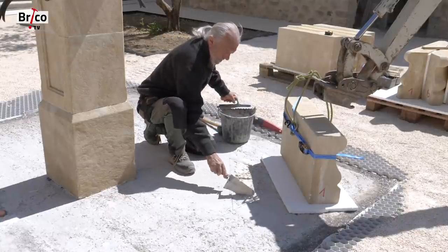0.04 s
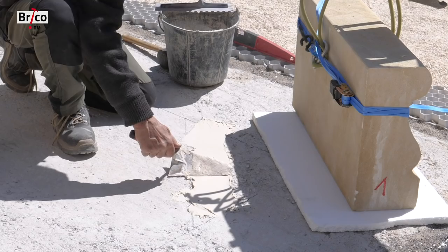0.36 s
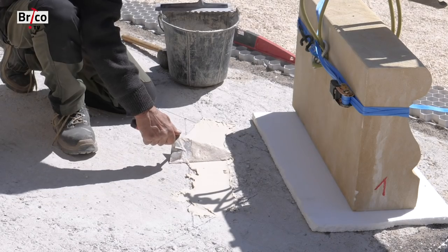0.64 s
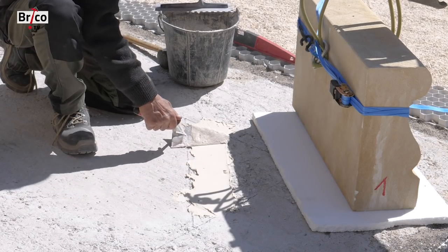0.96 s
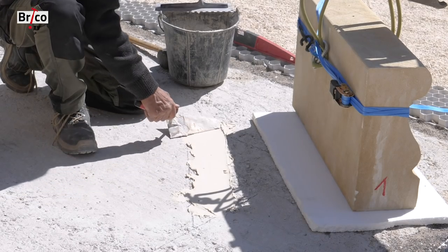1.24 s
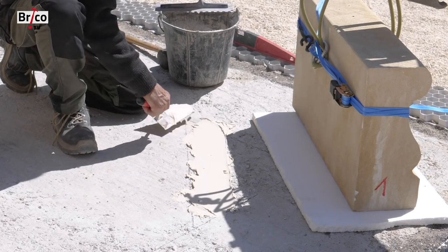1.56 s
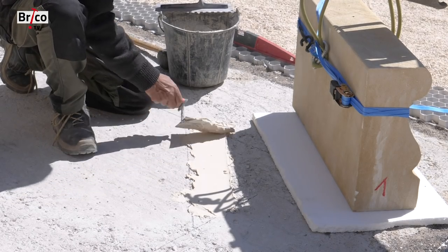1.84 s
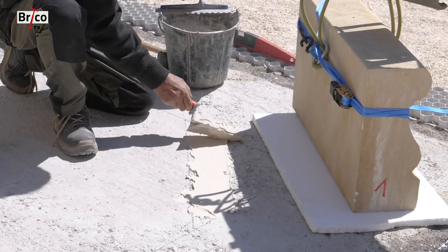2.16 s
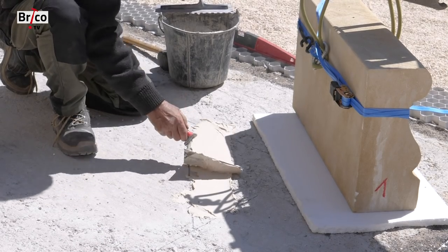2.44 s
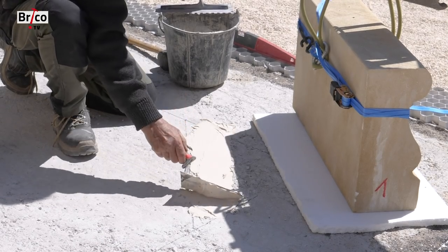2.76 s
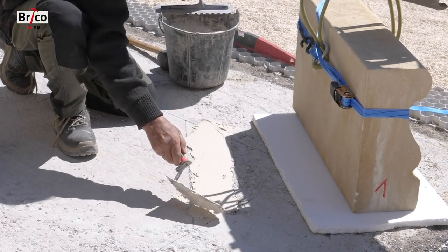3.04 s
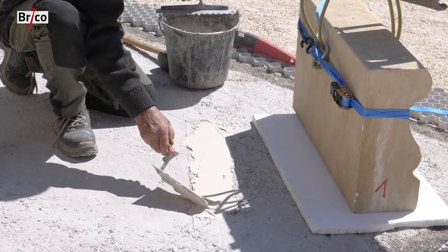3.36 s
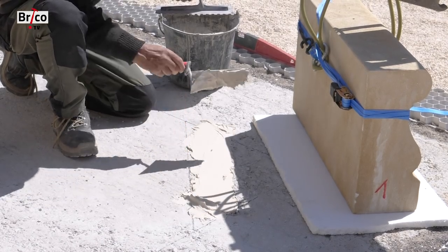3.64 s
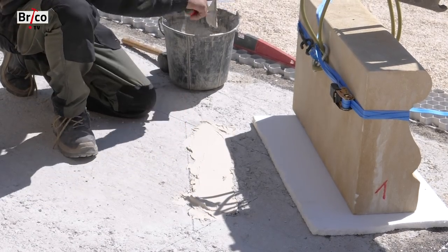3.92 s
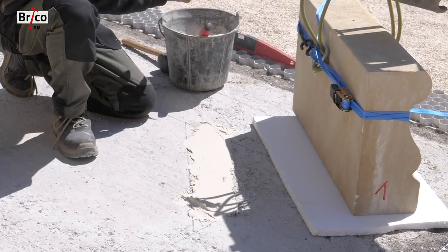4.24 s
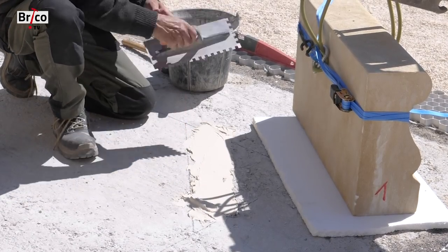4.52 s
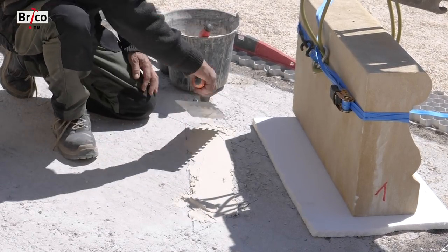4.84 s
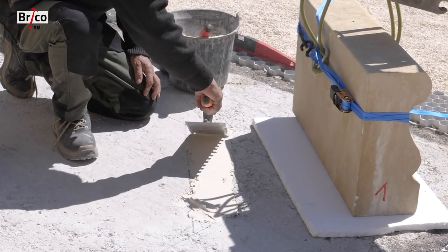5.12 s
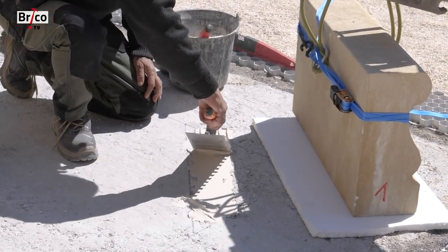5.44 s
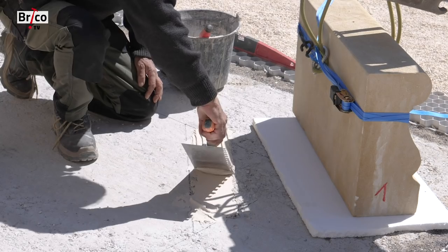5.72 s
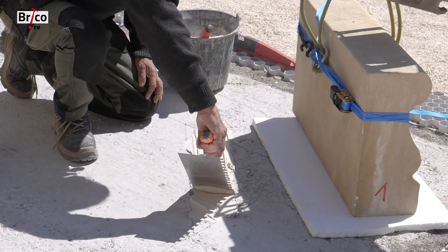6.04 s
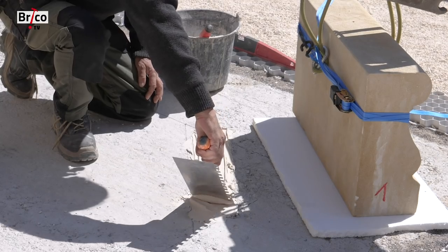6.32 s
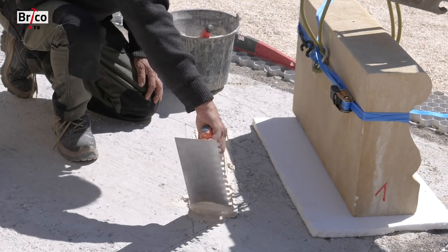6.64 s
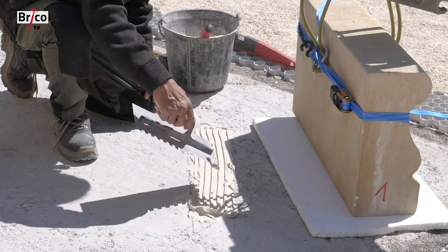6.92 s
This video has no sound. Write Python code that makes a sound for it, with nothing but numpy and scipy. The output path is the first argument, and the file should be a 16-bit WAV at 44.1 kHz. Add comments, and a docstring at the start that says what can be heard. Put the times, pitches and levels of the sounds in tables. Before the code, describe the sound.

Outdoors, gusts thump and rumble on the microphone while heavy clothing rustles. Two hard, damped trowel taps on concrete lead into short chops, a faint wet spreading hiss and a rasping scrape. The tool drops into a plastic bucket with a quick rattle, and a second steel blade gives a light ping. Its notched edge then grinds through mortar in a long, jerky scrape, ending with a short flick.

```python
"""An outdoor yard with a concrete slab. A mason taps, chops and smooths mortar with a pointed steel
trowel: knocks and crushed sand drive the damped blade, and wet paste hisses under its flat. The trowel
drops into a plastic bucket; a notched one rings as it is lifted, then combs the bed, its teeth sticking
and slipping on the concrete. Wind buffets the microphone and work clothes rustle throughout."""
import sys
import numpy as np
from scipy import signal
from scipy.fft import rfft, irfft
from scipy.io import wavfile
from scipy.ndimage import uniform_filter1d

SR = 44100
rng = np.random.default_rng(int(sys.argv[2]) if len(sys.argv) > 2 else 0)


def int16_out(signal):
    """Quantize to a 16-bit WAV file."""
    q = np.round(np.clip(np.atleast_2d(signal).T, -1, 1) * 32767)
    wavfile.write(sys.argv[1], SR, q.astype(np.int16))


N = 312228
TIME = np.arange(N) / SR
SHORT = 8192  # samples in one knock or skid

# tone of wet mortar: (frequency [Hz], level [dB])
PASTE_TONE = [(150, -0.5), (600, 1.5), (1300, 1), (2500, 0.5), (5000, -1.5), (9000, 0.5), (11500, -1),
              (14000, -5.5), (16000, -12)]
# tone of a trowel blade: (frequency [Hz], level [dB])
TROWEL_TONE = [(150, -3), (300, -18), (500, -0.5), (850, -9), (1600, -2), (2600, -3.5), (3700, -6),
               (6000, -10.5), (10000, -9), (13000, -17.5), (16000, -23)]
# resonances of the notched blade: (frequency [Hz], width [Hz], lift [dB])
NOTCHED_MODES = [(533, 90, 0.5), (1160, 46, 13), (1218, 50, 10), (1656, 170, 5), (2110, 62, 2.5),
                 (2980, 260, 5.5), (3250, 120, 3), (5030, 180, 7), (5600, 120, 3.5), (6070, 180, 5.5),
                 (6350, 120, 3.5), (9580, 260, 4), (10450, 300, 3)]


def undb(db):
    """Decibels to gain."""
    return 10 ** (np.asarray(db) / 20)


def unit(x):
    """Scale to rms 1."""
    return x / np.sqrt(np.mean(x ** 2) + 1e-18)


def curve(rows, column):
    """One dB column of a table, joined by straight lines in time; silent outside it."""
    rows = np.array(rows)
    return np.interp(TIME, rows[:, 0], rows[:, column], left=-120, right=-120)


def add(out, s, x):
    """Mix x into out from time s."""
    i = max(int(s * SR), 0)
    out[i:i + len(x)] += x[:max(len(out) - i, 0)]


def body(tone, modes=(), size=4096):
    """Causal impulse response, energy 1, of a broad tone lifted by resonances."""
    f = np.maximum(np.arange(size // 2 + 1) * SR / size, 1)
    hz, db = np.transpose(tone)
    db = np.interp(np.log(f), np.log(hz), db) - 20 * np.log10(1 + (hz[0] / f / 2) ** 2)
    for centre, width, lift in modes:
        db = db + lift / (1 + (2 * (f - centre) / width) ** 2)
    cepstrum = irfft(np.log(undb(db)))
    fold = 1 + np.sign(size // 2 - np.arange(size))  # minimum phase keeps the attack sharp
    fold[0] = 1
    return unit(irfft(np.exp(rfft(cepstrum * fold)))) / np.sqrt(size)


def ring(force, response):
    """Drive a body with a force."""
    return signal.fftconvolve(force, response)[:len(force)]


def split(x, hz):
    """The parts below and above a frequency."""
    return [signal.sosfilt(signal.butter(4, hz, kind, fs=SR, output="sos"), x)
            for kind in ("low", "high")]


def walk(rate):
    """Random drift, rms 1: levels held 1 / rate s and smoothed twice."""
    hold = int(SR / rate)
    held = rng.standard_normal(N)[np.arange(N) // hold]
    return unit(uniform_filter1d(uniform_filter1d(held, hold), hold))


def sand(rate, spread_db):
    """Clicks of grains, rate a second: many small, a few large."""
    when, weight, polarity = rng.random((int(rate * N / SR), 3)).T
    size = undb(spread_db * np.minimum(-np.log(1 - weight), 4))
    return unit(np.bincount((when * N).astype(int), size * np.sign(polarity - .5), N))


def strokes(rows, attack, release):
    """Envelope of hand movements: each sets in, swells or fades evenly, and dies away."""
    out, t = np.zeros(N), TIME[:SR]
    for s, length, start_db, end_db in rows:
        gain = undb(np.interp(t, [0, length], [start_db, end_db]))
        add(out, s, gain * np.minimum(t / attack, 1) * np.exp(-np.maximum(t - length, 0) / release))
    return out


def blows(rows, tone, modes, cross_hz, crunch, width, lift_db):
    """A click and a dying crunch; where it lands picks a main resonance, hardness the treble."""
    out, t = np.zeros(N), TIME[:SHORT]
    for s, db, decay, treble_db, hz in rows:
        low, high = split(body(tone, [*modes, (hz, width * hz, lift_db)]), cross_hz)
        force = crunch * rng.standard_normal(SHORT) * np.exp(-t / decay)
        force[0] += 1
        hit = unit(ring(force, low + undb(treble_db) * high))
        add(out, s, hit * undb(db) * np.sqrt((.005 + decay) * SR / SHORT))
    return out


def skid(length, rise, release):
    """Envelope of a slip: builds up, and dies away after its length."""
    t = TIME[:SHORT]
    return np.minimum(t / rise, 1) * np.exp(-np.maximum(t - length, 0) / release)


def skids(rows, grains, tone, modes, cross_hz, blade_trim_db, grit_trim_db, rise, release, edge_db):
    """Slips crush grains; the blade bends with the lows, the bit of edge that catches tints the highs."""
    out = np.zeros(N)
    spots_hz = rng.uniform(3000, 14000, (len(rows), 9))
    for (s, length, blade_db, grit_db), spot in zip(rows, spots_hz):
        edge = [(hz, hz / 20, edge_db) for hz in spot]
        blade, grit = split(body(tone, [*modes, *edge], size=2048), cross_hz)
        i = int(s * SR)
        force = grains[i:i + SHORT] * skid(length, rise, release)
        for part, db in ((blade, blade_db + blade_trim_db), (grit, grit_db + grit_trim_db)):
            add(out, s, unit(ring(force, part)) * undb(db) * np.sqrt(length * SR / SHORT))
    return out


def stick_slip(hard, span_s, gap_s, length_s, blade_db, grit_db, jitter):
    """Between its hard slips a dragged edge keeps catching about every gap_s; returns all the slips."""
    times = [s for s, *_ in hard if span_s[0] < s < span_s[1]]
    due = [s for a, b in zip(times, times[1:])
           for s in np.linspace(a, b, round((b - a) / gap_s) + 1)[1:-1]]
    chance = rng.uniform(-0.98, 1, (len(due), 4))
    lesser = [(s + jitter * gap_s * late, length_s * 2 ** (.5 * stretch),
               blade_db + 2 * bend, grit_db + 2 * crush)
              for s, (late, stretch, bend, crush) in zip(due, chance)]
    return list(hard) + lesser


def outdoors():
    """A faint bed of open air."""
    # tone of the air: (frequency [Hz], level [dB])
    air_tone = [(40, 3), (150, 1), (400, -4), (1000, -12), (3000, -16.5), (9000, -19.5), (16000, -32)]
    return unit(ring(rng.standard_normal(N), body(air_tone))) * undb(-51.5)


def wind():
    """A restless breeze and bell-shaped gusts rumble on the microphone; a few eddies thump sharply."""
    # tone of the turbulence: (frequency [Hz], level [dB])
    rumble = [(15, -12), (30, -9), (50, 2.5), (72, 2), (105, -6), (150, -15), (220, -20.5), (350, -36),
              (700, -69), (2000, -79)]
    # gusts: (peak time [s], length [s], level [dB])
    gusts = [(0.478, 0.14, -26.5), (0.86, 0.25, -32), (1.285, 0.16, -34), (1.55, 0.034, -23.5),
             (1.677, 0.1, -29.5), (1.932, 0.15, -34.5), (2.258, 0.06, -29.5), (2.393, 0.04, -26.5),
             (2.651, 0.045, -34.5), (2.965, 0.028, -36.5), (3.1, 0.037, -38), (3.737, 0.14, -29),
             (4.134, .14, -38), (4.582, .07, -36.5), (5.297, .06, -36), (5.652, 0.057, -31),
             (5.832, 0.052, -33), (6.06, 0.15, -35.5), (6.53, 0.067, -35), (6.72, 0.18, -35.5),
             (7.025, 0.29, -33)]
    # sharp buffets: (time [s], level [dB], decay [s], treble [dB], resonance [Hz])
    buffets = [(0.209, -26.5, 0.0066, 18, 131), (.433, -18.5, 0.0094, 3, 90), (.49, -22.5, 0.016, 3, 69.6),
               (.763, -17, 0.0086, -3, 80), (0.889, -21, 0.0078, 2, 85.6), (1.305, -24.5, 0.016, 0, 81.6),
               (1.54, -24, 0.0069, 9, 60), (1.675, -29, 0.011, 7, 71), (3.734, -25, 0.013, -2, 91),
               (6.508, -22.5, 0.0087, 5, 64.4)]
    eddies = ring(rng.standard_normal(N), body(rumble))
    eddies /= np.sqrt(uniform_filter1d(eddies ** 2, int(.06 * SR)) + 0.036)  # even out the level
    swells = sum(undb(db) * np.exp(-2 * ((TIME - s) / length) ** 2) for s, length, db in gusts)
    breeze = undb(-44.5 + 4 * walk(14))
    thumps = blows(buffets, rumble, [], cross_hz=170, crunch=0.1, width=0.16, lift_db=4.5)
    return eddies * np.hypot(swells, breeze) + thumps


def smoothing():
    """Fine wet sand hisses under the flat of the blade, stroke by stroke."""
    # passes over the mortar: (time [s], length [s], start level [dB], end level [dB])
    passes = [(0, 0.51, -40, -50.5), (.655, 0.28, -36.5, -59), (.98, 0.58, -51.5, -44.5),
              (1.77, 0.15, -44.5, -45), (2.31, 0.42, -40.5, -41), (2.74, 0.71, -43, -53),
              (6.43, 0.15, -45, -45)]
    hiss = unit(ring(sand(rate=16000, spread_db=2.5), body(PASTE_TONE)))
    flicker = undb(2.4 * walk(30.9) - 2.9)
    return hiss * strokes(passes, attack=0.01, release=0.026) * flicker


def clothes():
    """With each move heavy cloth rubs in uneven folds and a sleeve swishes; at times it bumps softly."""
    # the mason shifts and reaches: (time [s], length [s], rub [dB], swish [dB])
    moves = [(0, 0.35, -45.5, -62), (1.957, 0.28, -42.5, -52), (2.596, .25, -48.5, -57),
             (3.398, 0.51, -41, -45.5), (3.919, 0.36, -40.5, -38), (4.092, 0.065, -47, -46),
             (4.288, 0.23, -41.5, -44.5), (4.38, 0.055, -46.5, -36), (4.504, 0.088, -31.5, -42),
             (4.645, 0.35, -42, -39), (6.607, 0.23, -59, -50), (6.828, 0.33, -42, -48)]
    # tones of heavy cloth and of the sleeve: (frequency [Hz], level [dB])
    cloth_tone = [(70, -3), (180, 4.5), (350, -0.5), (700, -6.5), (1500, -12.5), (3000, -13.5),
                  (6000, -16.5), (15000, -24)]
    sleeve_tone = [(150, -3), (600, 2.5), (1300, 0), (2500, 0), (5000, -1.5), (9000, -2.5), (11500, -3.5),
                   (14000, -12), (16000, -16)]
    # bumps of sleeve and knee: (time [s], level [dB], decay [s], treble [dB], resonance [Hz])
    bumps = [(3.502, -39, 0.012, -18, 249), (4.538, -30.5, .025, -7, 277), (6.583, -40, 0.012, 0, 416),
             (6.895, -37, 0.013, -19, 340)]
    ease = dict(attack=0.057, release=0.061)
    rubbing = strokes([(s, length, db, db) for s, length, db, _ in moves], **ease)
    swishing = strokes([(s, length, db, db) for s, length, _, db in moves], **ease)
    folds = sand(rate=6000, spread_db=0.5) * undb(3.7 * walk(45))
    rub = unit(ring(folds, body(cloth_tone)))
    rub *= np.hypot(rubbing, undb(-54.5))  # a faint rustle stays between moves
    swish = unit(ring(sand(rate=16000, spread_db=4.5), body(sleeve_tone)))
    swish *= np.hypot(swishing, undb(-51.5)) * undb(0.79 * walk(25.02) - 4.5)
    return rub + swish + blows(bumps, cloth_tone, [], cross_hz=784, crunch=0.56, width=0.48, lift_db=16)


def pointed_trowel():
    """Knocks on the slab, chops and a gritty scrape; the mortar damps the blade at once."""
    # knocks on the slab: (time [s], level [dB], decay [s], treble [dB], resonance [Hz])
    taps = [(.0703, -8, 0.0022, -5, 1470), (.0786, -19, 0.003, 3, 1500), (.0834, -22, 0.004, -24, 1150),
            (.089, -34, 0.009, 5, 1140), (.2913, -4.5, 0.0022, 2, 1150), (.2983, -33, .002, -13, 1250),
            (.308, -32, .003, 18, 1110), (.3116, -27, 0.0018, 5, 1920), (2.576, -31, 0.0035, 1.5, 1410),
            (3.384, -28.5, 0.0031, -9.5, 840)]
    # the edge scrapes the slab: (time [s], length [s], start level [dB], end level [dB])
    scrapes = [(.668, 0.045, -41, -45), (2.072, 0.082, -35, -20.5), (2.183, 0.056, -26, -26)]
    # chops through mortar, and the hardest catches of sand: (time [s], length [s], blade [dB], grit [dB])
    chops = [(.675, 0.0052, -33, -33.5), (.685, 0.0027, -35, -29), (.7115, 0.0044, -20.5, -21.5),
             (.716, 0.0021, -20, -27), (.721, 0.0042, -45, -44), (.7885, 0.0038, -31, -20.5),
             (.801, 0.0023, -30.5, -33)]
    hard_catches = [(2.074, .0028, -38, -29), (2.141, 0.0025, -19, -33), (2.151, 0.0045, -19, -34),
                    (2.159, .0043, -20.5, -30), (2.183, 0.0086, -18.5, -17), (2.222, .0069, -19.5, -29),
                    (2.243, 0.0052, -20, -28), (2.256, 0.0033, -18, -22), (2.277, 0.0023, -14, -15.5),
                    (2.301, 0.004, -17, -21), (2.315, .003, -25, -32)]
    # single grains flick the blade: (time [s], level [dB])
    ticks = [(2.387, -43), (2.529, -41), (2.587, -36.5), (2.738, -42.5), (2.959, -45), (2.974, -44),
             (2.996, -46), (3.292, -43)]
    # tones of the blade knocked and chopping: (frequency [Hz], level [dB])
    knock_tone = [(100, -35), (300, -12), (600, -6.5), (1000, -5), (2100, -9.5), (3500, -12.5), (8000, -13),
                  (12000, -12.5), (16000, -18)]
    chop_tone = [(200, -17), (550, -9.5), (850, -9), (1500, -7.5), (2600, -6.5), (3700, -3.5), (6000, -10),
                 (8500, -8.5), (12000, -19), (16000, -23)]
    # its resonances knocked, chopping and scraping: (frequency [Hz], width [Hz], lift [dB])
    knock_modes = [(2080, 230, 4.5), (2940, 250, 5), (4530, 200, 3), (5140, 350, 7), (5870, 230, 3),
                   (8170, 790, 4)]
    chop_modes = [(860, 160, 12), (1260, 70, 5), (1707, 140, 11.5), (2500, 270, 10.5), (3130, 200, 13),
                  (4400, 280, 9), (7200, 250, 4), (8200, 360, 14.5)]
    scrape_modes = [(834, 220, 11.5), (1180, 470, 6.5), (1540, 140, 5.5), (2390, 450, 7), (3050, 370, 6.5),
                    (5000, 1000, 8), (8000, 280, 6.5)]
    grit = sand(rate=3500, spread_db=1) * undb(2 * walk(300))
    out = unit(ring(grit, body(TROWEL_TONE, scrape_modes)))
    out *= strokes(scrapes, attack=0.0046, release=0.007) * undb(0.5)
    catches = stick_slip(hard_catches, span_s=(2.13, 2.28), gap_s=.013, length_s=0.004,
                         blade_db=-24, grit_db=-29.5, jitter=.15)
    out += skids(catches, sand(rate=5000, spread_db=3.5), TROWEL_TONE, scrape_modes, cross_hz=2080,
                 blade_trim_db=0.5, grit_trim_db=-0.2, rise=0.0005, release=0.0016, edge_db=6)
    out += skids(chops, sand(rate=11000, spread_db=4.5), chop_tone, chop_modes, cross_hz=2170,
                 blade_trim_db=3.5, grit_trim_db=-0.5, rise=0.00079, release=0.00088, edge_db=-3)
    out += blows(taps, knock_tone, knock_modes, cross_hz=2800, crunch=0.15, width=0.52, lift_db=12.5)
    tick_hits = [(s, db, 0.0038, -8, 2310) for s, db in ticks]  # same columns as taps
    return out + blows(tick_hits, PASTE_TONE, [], cross_hz=5940, crunch=0.55, width=0.21, lift_db=18.5)


def tool_swap():
    """One trowel clatters into the bucket; the other is picked up and rings freely."""
    # light touches of steel, and the trowel landing and rocking in the bucket:
    # (time [s], level [dB], decay [s], treble [dB], resonance [Hz])
    touches = [(3.808, -37, 0.0028, 22, 4800), (3.84, -37.5, 0.002, -2, 1240),
               (4.415, -40.5, 0.06, 14, 1750), (4.465, -37.5, 0.037, -3, 1730),
               (4.562, -29, 0.022, 8, 1150), (4.574, -32.5, 0.04, 8, 1120), (4.65, -38, 0.044, -1, 1940),
               (4.865, -40, 0.029, 9, 8900)]
    bucket_hits = [(4.2356, -14, 0.002, 16, 1580), (4.2385, -22.5, 0.0021, 32, 2500),
                   (4.242, -25, 0.0084, -7, 930), (4.2543, -19, 0.0069, -13, 1480),
                   (4.2618, -24, 0.0034, -11, 1060), (4.265, -21, 0.0048, -12, 650),
                   (4.2705, -28, 0.0021, -14, 900), (4.2765, -26, .002, 1, 1800),
                   (4.279, -23.5, .003, -2, 900), (4.325, -35.5, 0.0092, 15, 1300)]
    # tone of the plastic bucket: (frequency [Hz], level [dB])
    bucket_tone = [(80, -9), (300, 2.5), (550, -0.5), (850, 4), (1500, 0), (2300, -7), (3100, -19),
                   (4500, -31), (9000, -21.5), (16000, -41)]
    # partials of the lifted notched blade: (frequency [Hz], level [dB], t60 [s])
    partials = [(1152, -30.5, 0.49), (2918, -54, .3), (4830, -51, .08), (6487, -52, .3)]
    out = blows(bucket_hits, bucket_tone, [], cross_hz=2390, crunch=0.23, width=0.27, lift_db=10.5)
    out += blows(touches, TROWEL_TONE, NOTCHED_MODES, cross_hz=2480, crunch=0.42, width=0.15,
                 lift_db=11.5)
    lift_s, t = 4.572, TIME[:SR]
    ping = sum(undb(db - 60 * t / t60) * np.sin(2 * np.pi * hz * t) for hz, db, t60 in partials)
    add(out, lift_s, ping)
    return out


def notched_trowel():
    """Teeth grind, stick and skid in jerks; as the blade tilts it flexes below its main note."""
    # the pull through the bed, then the flick clear: (time [s], drag [dB], flex [dB])
    pull = [(5.02, -47, -15), (5.11, -22, -20), (5.17, -21.5, -3), (5.35, -20.5, -29), (5.54, -18, -15),
            (5.61, -21, -4), (5.79, -24, 5), (6.02, -24.5, 5), (6.23, -22, 6.5), (6.29, -33, 10.5),
            (6.31, -70, 8)]
    flick = [(6.43, -70, 5), (6.46, -29, 4.5), (6.5, -38, -3.5), (6.53, -33, 8.5), (6.57, -79, -2)]
    # hardest skids, where teeth land or break loose: (time [s], length [s], blade [dB], grit [dB])
    hard_slips = [(5.024, .017, -16, -18), (5.061, 0.0032, -31, -18), (5.099, 0.0055, -28, -13.5),
                  (5.112, 0.021, -18, -16), (5.18, 0.011, -17.5, -19.5), (5.282, .011, -15, -24),
                  (5.336, 0.011, -20, -15.5), (5.527, .012, -19, -18), (5.748, 0.018, -22, -18.5),
                  (5.875, .02, -16.5, -16.5), (5.934, 0.0064, -17, -16), (5.953, 0.035, -18.5, -22),
                  (6.039, 0.022, -19, -19.5), (6.123, 0.024, -19.5, -20.5), (6.213, 0.016, -20.5, -21),
                  (6.349, .0048, -37.5, -37), (6.456, 0.023, -19.5, -22.5), (6.489, 0.0032, -16.5, -21.5),
                  (6.512, 0.017, -28.5, -37)]
    # tones of the steel and of its flexing: (frequency [Hz], level [dB])
    steel_tone = [(120, -9), (260, -8.5), (400, -1.5), (540, 4), (660, -7), (800, 3.5), (1150, 3.5),
                  (1500, -6.5), (2500, -3.5), (3500, 0), (4500, 0), (8000, -0.5), (10500, 0.5), (13000, -6),
                  (16000, -5.5)]
    flex_tone = [(500, -30), (680, -12.5), (790, -0.5), (980, 3.5), (1100, -1.5), (1400, -6), (1900, -36)]
    slips = stick_slip(hard_slips, span_s=(5.1, 6.25), gap_s=.0425, length_s=0.012,
                       blade_db=-23, grit_db=-20.5, jitter=0.19)
    stick_s = 0.0054  # the teeth stick just before each skid, and the drag dips slightly
    stuck, jerks = np.zeros(N), np.zeros(N)
    for s, length, blade_db, _ in slips:
        add(stuck, s - stick_s, skid(stick_s, rise=0.0073, release=0.0013))
        add(jerks, s, undb(blade_db - 4.5) * skid(length, rise=0.0019, release=0.0023))
    drag = undb(curve(pull + flick, column=1) - stuck)
    grind = unit(sand(rate=6000, spread_db=4) * undb(1.74 * walk(220))) * drag
    chatter = skids(slips, sand(rate=6000, spread_db=3.5), steel_tone, NOTCHED_MODES, cross_hz=1960,
                    blade_trim_db=-4.5, grit_trim_db=-2.5, rise=0.0011, release=0.0035, edge_db=4.5)
    flex = ring(sand(rate=3000, spread_db=4) * (drag + jerks), body(flex_tone))
    flex *= undb(curve(pull + flick, column=2) - 11)
    steel = ring(grind, body(steel_tone, NOTCHED_MODES)) + chatter + flex
    return block_reflection(steel, start_s=pull[0][0], share=0.36)


def block_reflection(x, start_s, share):
    """Highs bounce off a stone block; the path grows as the hand travels, so their colour shifts."""
    low, high = split(x, 2600)
    delay_s = .0026 + 0.000248 * (TIME - start_s) + .00004 * walk(7)
    echo = np.interp(TIME - delay_s, TIME, high)
    return low + (high + share * echo) / np.sqrt(1 + share ** 2)


def yard(x, near_db, near_t60, far_db, far_t60):
    """Dull scatter from the stone blocks close by and a faint tail from distant walls."""
    t = TIME[:SR // 2]
    fade = undb(near_db - 60 * t / near_t60) + undb(far_db - 60 * t / far_t60)
    low, high = split(rng.standard_normal(len(t)) * fade * (t > .003), 1880)
    return ring(x, low + undb(-2.5) * high)


def ground_scatter(x, decay):
    """Glancing reflections from the ground arrive a little late and differ between left and right."""
    t = TIME[:SHORT]
    glance = rng.standard_normal(SHORT) * np.exp(-t / decay) * (t > .004)
    return ring(x, unit(glance) / np.sqrt(SHORT))


def scene():
    """The work lies nearly straight ahead; a little scatter and open air give it width."""
    soft = smoothing() + clothes()
    knocks = pointed_trowel() + tool_swap()
    comb = notched_trowel()
    work = knocks + comb + soft
    gusts = wind()
    reverb = yard(work, near_db=-35.5, near_t60=0.073, far_db=-70, far_t60=1.0)
    mid = work + reverb + gusts + outdoors()
    send = undb(-32) * knocks + undb(-30) * comb + undb(-20.5) * soft + undb(-42) * gusts
    side = ground_scatter(send, decay=0.013) + undb(-17) * outdoors()
    pan_db = 1.5 * (1 - np.tanh((TIME - 0.35) * 20)) / 2  # the mix leans right for the first taps
    return np.array([(mid + side) * undb(-pan_db / 2), (mid - side) * undb(pan_db / 2)])


def record(dry):
    """The hardest knocks overload the input; the top is cut."""
    top_cut = signal.ellip(10, .2, 80, 15700, fs=SR, output="sos")
    return signal.sosfilt(top_cut, np.clip(dry, -.97, .97))


dry = scene()
out = record(dry)
int16_out(out)
```